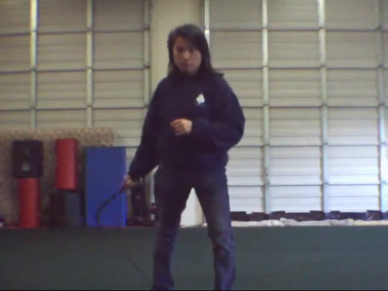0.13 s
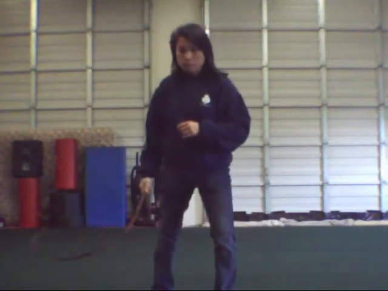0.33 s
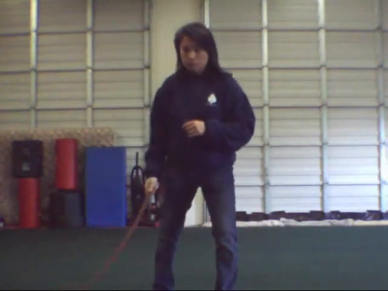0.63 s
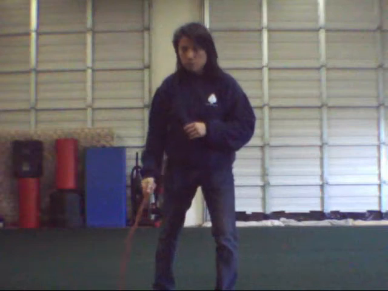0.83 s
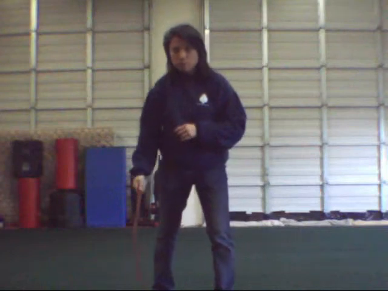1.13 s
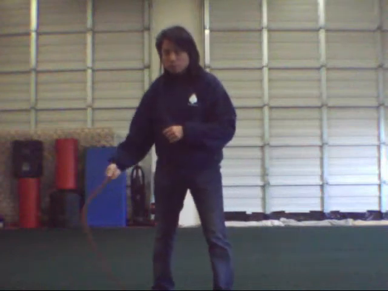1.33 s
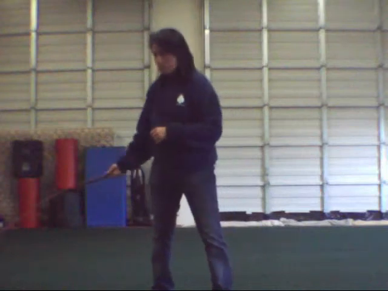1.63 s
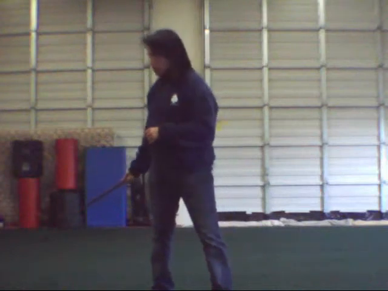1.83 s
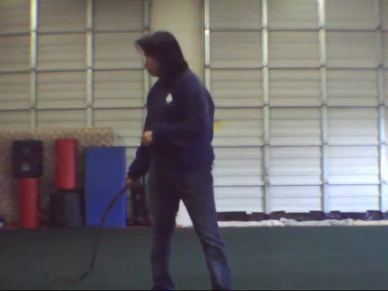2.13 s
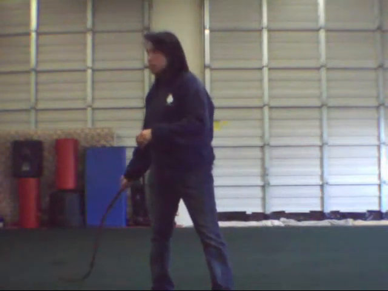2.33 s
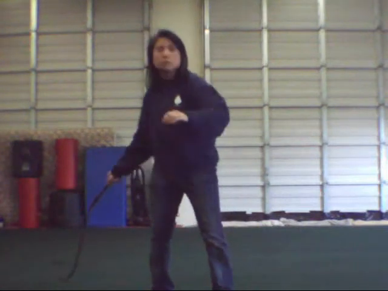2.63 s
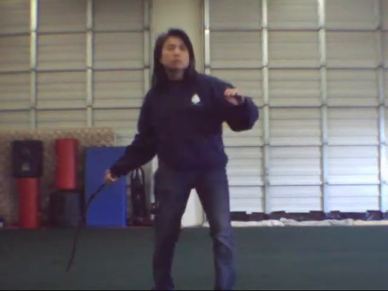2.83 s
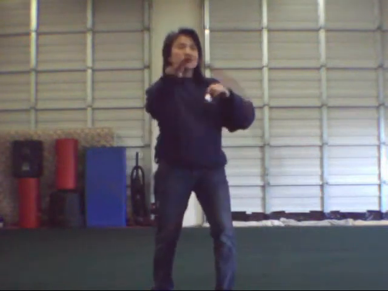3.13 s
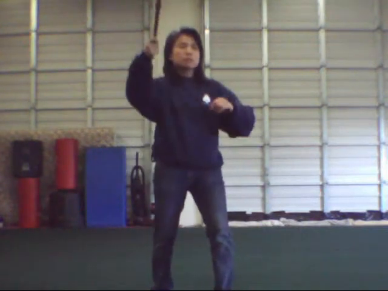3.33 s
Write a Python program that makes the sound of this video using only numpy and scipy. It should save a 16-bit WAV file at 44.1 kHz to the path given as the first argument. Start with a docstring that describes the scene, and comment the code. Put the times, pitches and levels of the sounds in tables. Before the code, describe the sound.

A bullwhip cracks once in a large hall, after a quiet lead-in. Steady ventilation hum, hiss and a faint electrical whine run throughout. The whip swishes briefly at about 0.7 seconds, then more faintly near 1 and 2.7 seconds. At about 3.2 seconds a quick rush of air ends in the loud, sharp crack, which briefly overloads the microphone and echoes off the hard walls.

```python
"""A bullwhip cracks in a large hard-walled hall, after a few soft swishes of the whip swung slowly past.
The tip speeds up, rushes through the air and makes a shock; the walls throw it back in clusters over a
decaying wash. Ventilation hum, hiss and thin electrical tones lie underneath.
Faint deep noise cuts in and out.
The small microphone sits on a steady voltage offset; the crack shoves its diaphragm and overloads it."""
import sys
import numpy as np
from scipy import signal
from scipy.fft import rfft, irfft
from scipy.io import wavfile
from scipy.ndimage import uniform_filter1d

SR = 44100
rng = np.random.default_rng(int(sys.argv[2]) if len(sys.argv) > 2 else 0)


def log_audio(samples):
    """Write samples as a 16-bit WAV file to the path given in sys.argv[1]."""
    # one column per channel
    frames = np.atleast_2d(samples).T
    # limit to full scale, then quantise
    limited = np.clip(frames, -1, 1)
    pcm = np.round(limited * 32767).astype(np.int16)
    wavfile.write(sys.argv[1], SR, pcm)


N = 153468

# Direct shock and wall echoes: start_s, level_db, t60_s, bass_relative_db
ARRIVALS = [(3.2392, 6, 0.01, -7.5), (3.2442, 4, 0.0366, -6), (3.2575, 4, 0.0657, -9.5),
            (3.267, -1, 0.02, -10), (3.276, -2.5, 0.09, -13), (3.284, -4, 0.04, 1), (3.310, -5, 0.11, -2.5),
            (3.321, -8, 0.12, -0.5), (3.331, -7, 0.14, 0), (3.352, -9.5, 0.14, 4.5),
            (3.384, -12.5, 0.27, -2), (3.426, -18.5, 0.4, -1)]
# Hall decay: frequency_hz, t60_s
HALL_DECAY = [(100, .8), (300, 0.9), (1000, 1.0), (2000, 0.63), (4000, 0.92), (8000, 0.76), (14000, 0.95)]
# Crack colour through hall and microphone: frequency_hz, relative_db
CRACK_SPECTRUM = [(60, -39), (123, -24), (230, -10), (265, -6.5), (460, -2.5), (752, -10), (948, -3),
                  (1140, -6.5), (2090, -6.5), (2510, -18), (3300, -22.5), (4280, -32.5), (5600, -29.5),
                  (8000, -37.5), (10300, -30), (12000, -36.5), (14000, -24), (15300, -27)]
# Slow swings of the whip: peak_s, centre_hz, peak_rms_db, rise_s, fall_s
SWINGS = [(.683, 640, -25, 0.026, .008), (0.675, 1670, -39, .05, .04), (0.95, 1030, -37, .12, 0.11),
          (2.72, 600, -38, 0.114, 0.066)]
# Ventilation noise density: frequency_hz, relative_db
VENT_SPECTRUM = [(40, -24), (80, -26), (105, -7), (142, -7.5), (231, -1), (349, -6), (435, -2), (974, -1),
                 (1100, -3), (1240, -4.5), (1440, -11), (1880, -8.5), (2400, -13.5), (6000, -20.5),
                 (15300, -27.5)]
# Electrical tones: pitch_hz, rms_db
WHINE_TONES = [(1001, -44.5), (6503, -69), (7499, -62), (8500, -63), (9502, -71)]
# Patches of faint deep noise: middle_s, centre_hz, peak_rms_db, half_length_s
LOW_NOISE_PATCHES = [(0.387, 70, -51, 0.036), (.71, 75, -58, 0.054), (1.102, 70, -45.5, 0.085),
                     (1.335, 50, -47, .05), (1.69, 70, -46.5, .07), (1.85, 30, -48, 0.13),
                     (2.35, 30, -48, .09), (2.77, 35, -53, .05), (2.9, 70.5, -47, 0.31)]

CRACK_S = 3.2395


def crack(t):
    """The tip's shock and its reflections, coloured by hall and microphone."""
    return colour(clusters(t) + wash(t), CRACK_SPECTRUM)


def clusters(t, uneven_db=2, crossover_hz=694):
    """Direct shock and wall echoes: bursts of uneven noise, each with its own share of bass."""
    grains = rng.standard_normal(N) * undb(uneven_db * walk(600))
    treble_power = bass_power = 0
    for start_s, level_db, t60_s, bass_relative_db in ARRIVALS:
        envelope = undb(level_db) * cluster_envelope(t, start_s, t60_s)
        treble_power += envelope ** 2
        bass_power += (envelope * undb(bass_relative_db)) ** 2
    treble = butter(grains * np.sqrt(treble_power), crossover_hz, "high")
    bass = butter(grains * np.sqrt(bass_power), crossover_hz, "low")
    return treble - bass  # opposite polarity avoids a crossover notch


def cluster_envelope(t, start_s, t60_s, smear=0.042):
    """One bundle of reflections: the later it comes, the softer its front."""
    front_s = 1 / SR + smear * abs(start_s - CRACK_S)
    return np.clip((t - start_s) / front_s, 0, 1) * fade(t, start_s, t60_s, hold_s=0.0029)


def wash(t, gain_db=-6, rise_s=0.013):
    """Diffuse hall reverberation; each band dies at its own rate."""
    rise = 1 - np.exp(-np.maximum(t - CRACK_S, 0) / rise_s)
    tail = shaped_noise(lambda hz: fade(t, CRACK_S, lookup(HALL_DECAY, hz)))
    return rise * undb(gain_db) * tail


def thump(t, start_s=3.2415, gain_db=2.5, pitch_hz=303):
    """The pressure jump shoves the diaphragm once: a heavily damped low swing."""
    return undb(gain_db) * fade(t, start_s, t60_s=0.027) * np.sin(2 * np.pi * pitch_hz * (t - start_s))


def rush(t, start_s=3.207, rise_s=0.0093, whistle_s=3.234, whistle_rise_s=0.002):
    """Air tears round the accelerating tip, which sings in the last instant before the crack."""
    growth = (1 - np.exp(-np.maximum(t - start_s, 0) / rise_s)) ** 2
    air = band_noise(centre_hz=1600, width_hz=1600, rms_db=-16)
    broadband = level(colour(rng.standard_normal(N), CRACK_SPECTRUM), -10.5)
    tearing = butter(broadband, 800, "high", order=3)
    whistle = band_noise(centre_hz=2000, width_hz=600, rms_db=-11)
    whistle_onset = np.clip((t - whistle_s) / whistle_rise_s, 0, 1)
    return (t < CRACK_S) * (growth * (air + tearing) + whistle_onset * whistle)


def swishes(t):
    """The whip swung slowly past: hollow air noise that swells and drops."""
    total = np.zeros(N)
    for peak_s, centre_hz, peak_rms_db, rise_s, fall_s in SWINGS:
        envelope = np.exp(np.minimum((t - peak_s) / rise_s, (peak_s - t) / fall_s))
        total += envelope * band_noise(centre_hz, 0.39 * centre_hz, peak_rms_db)
    return total


def ventilation(swell_db=1.12, flicker_db=1.63, steady_above_hz=1200):
    """Hum whose bands swell together and flicker separately, under a near-steady hiss."""
    shared_db = swell_db * walk(2.65)

    def band_gain(hz):
        waver_db = (shared_db + flicker_db * walk(5.963)) / (1 + (hz / steady_above_hz) ** 2)
        return undb(lookup(VENT_SPECTRUM, hz) + waver_db)

    return level(shaped_noise(band_gain), rms_db=-31.5)


def whine(t):
    """Thin, steady electrical tones."""
    return sum(np.sqrt(2) * undb(rms_db) * np.sin(2 * np.pi * hz * t) for hz, rms_db in WHINE_TONES)


def low_noise(t):
    """Faint deep noise that cuts in and out."""
    total = np.zeros(N)
    for middle_s, centre_hz, peak_rms_db, half_length_s in LOW_NOISE_PATCHES:
        envelope = np.exp(-((t - middle_s) / half_length_s) ** 4)
        total += envelope * band_noise(centre_hz, 0.6 * centre_hz, peak_rms_db)
    return total


def undb(db):
    """Decibels to gain."""
    return 10 ** (np.asarray(db) / 20)


def level(x, rms_db):
    """Scale to an rms level."""
    return x * undb(rms_db) / np.sqrt(np.mean(x ** 2))


def lookup(table, hz):
    """Interpolate a table on a log-frequency axis."""
    frequencies_hz, values = np.array(table).T
    return np.interp(np.log(hz), np.log(frequencies_hz), values)


def butter(x, cutoff_hz, kind, order=2):
    """Butterworth filter."""
    return signal.sosfilt(signal.butter(order, cutoff_hz, kind, fs=SR, output="sos"), x)


def band_noise(centre_hz, width_hz, rms_db):
    """Band-passed noise at an rms level."""
    edges_hz = [centre_hz - width_hz / 2, centre_hz + width_hz / 2]
    return level(butter(rng.standard_normal(N), edges_hz, "band"), rms_db)


def shaped_noise(band_gain, lowest_hz=40):
    """Noise in third-octave bands, each weighted over time by band_gain(centre_hz)."""
    spectrum = rfft(rng.standard_normal(N))
    bin_hz = np.maximum(np.arange(N // 2 + 1) * SR / N, 1)
    band_index = 3 * np.log2(bin_hz / lowest_hz)
    total = np.zeros(N)
    for k in range(27):
        triangle = np.clip(1 - abs(band_index - k), 0, 1)
        total += band_gain(lowest_hz * 2 ** (k / 3)) * irfft(spectrum * triangle, N)
    return total


def colour(x, table):
    """Unit-energy, minimum-phase filter with the table's spectral shape."""
    bin_hz = np.maximum(np.arange(2049) * SR / 4096, 1)
    cepstrum = irfft(np.log(undb(lookup(table, bin_hz))))
    cepstrum[1:2048] *= 2  # fold onto positive time
    cepstrum[2049:] = 0
    response = irfft(np.exp(rfft(cepstrum)))
    return signal.fftconvolve(x, response / np.linalg.norm(response))[:N]


def walk(rate_hz):
    """Random steps, smoothed twice; spread near 1."""
    hold = int(SR / rate_hz)
    steps = np.repeat(rng.standard_normal(N // hold + 1), hold)
    return uniform_filter1d(uniform_filter1d(steps, hold), hold)[:N]


def fade(t, start_s, t60_s, hold_s=0):
    """Silent before start_s, full for hold_s, then falling 60 dB per t60_s."""
    return (t >= start_s) * undb(-60 * np.maximum(t - start_s - hold_s, 0) / t60_s)


def scene():
    """Whip, ventilation, electrical tones and faint deep noise, in mono."""
    t = np.arange(N) / SR
    return (ventilation() + low_noise(t) + whine(t) + swishes(t) + rush(t) + thump(t) + crack(t))[None]


def record(dry):
    """The microphone's offset signal clips hard at full scale; a steep low-pass cuts the top."""
    offset, cutoff_hz = 0.273, 15400
    clipped = np.clip(dry + offset, -1, 1) - offset
    lowpass = signal.ellip(12, 0.2, 55, cutoff_hz, fs=SR, output="sos")
    return offset + signal.sosfilt(lowpass, clipped)


dry = scene()
out = record(dry)
log_audio(out)
```